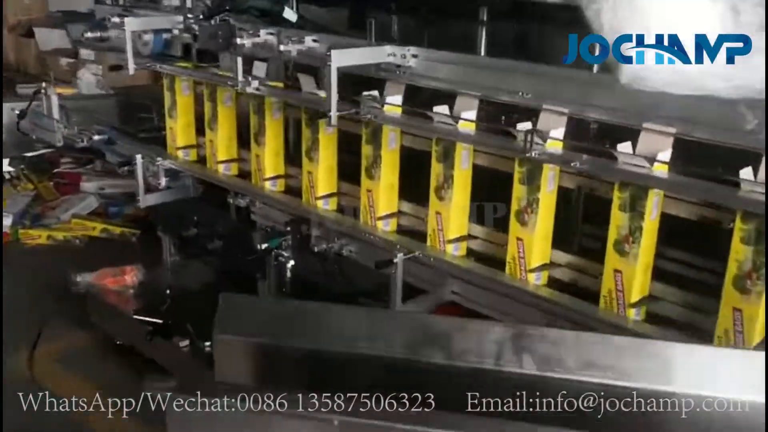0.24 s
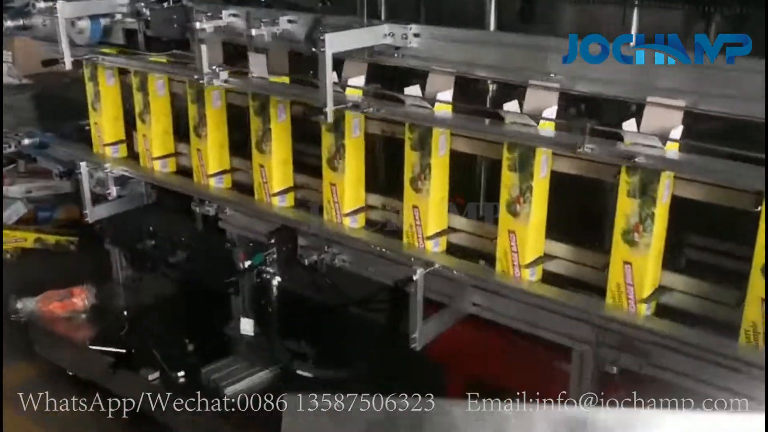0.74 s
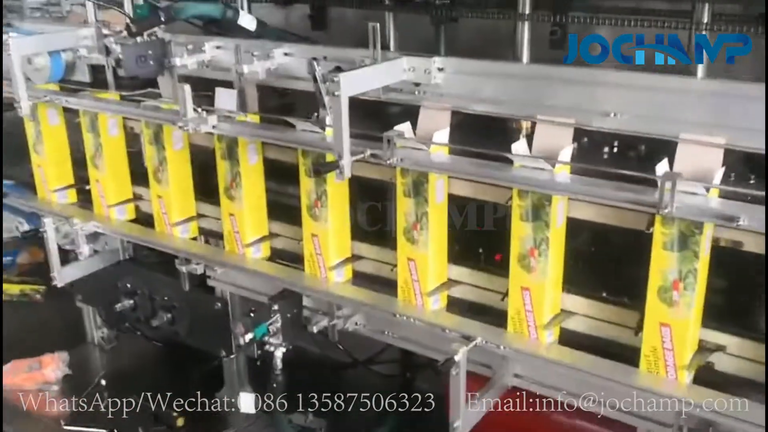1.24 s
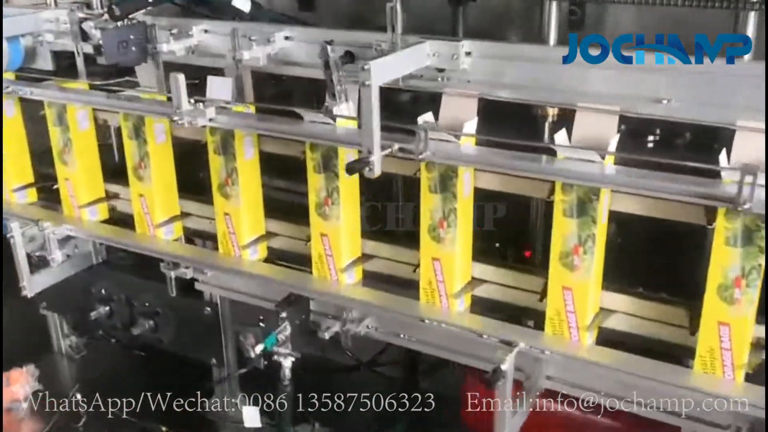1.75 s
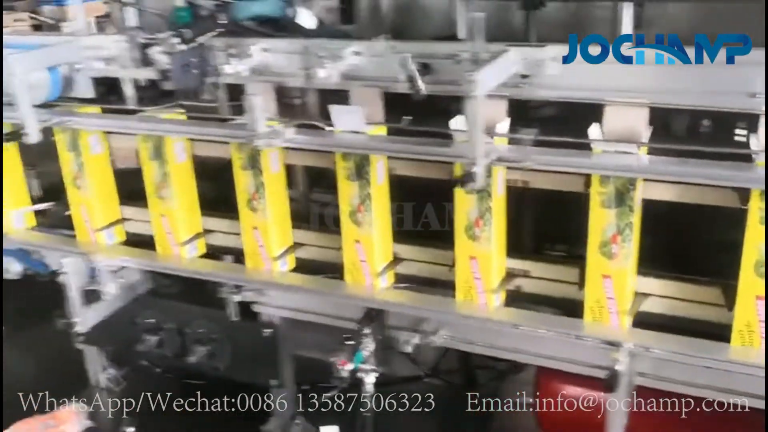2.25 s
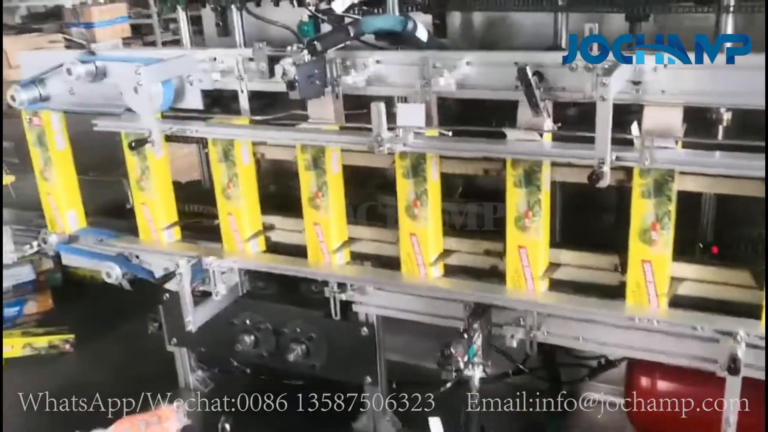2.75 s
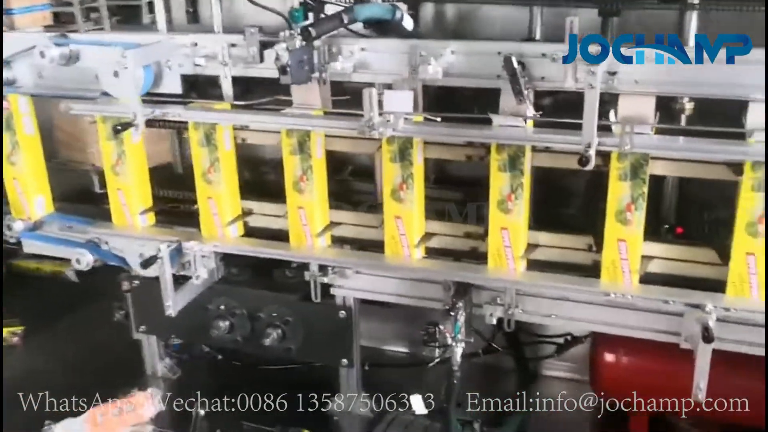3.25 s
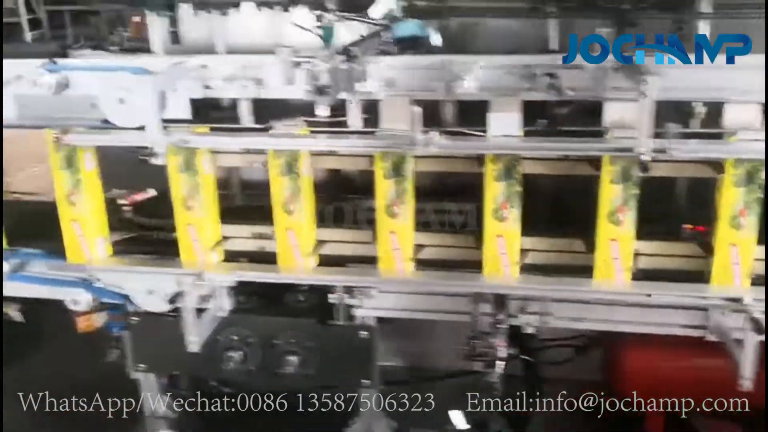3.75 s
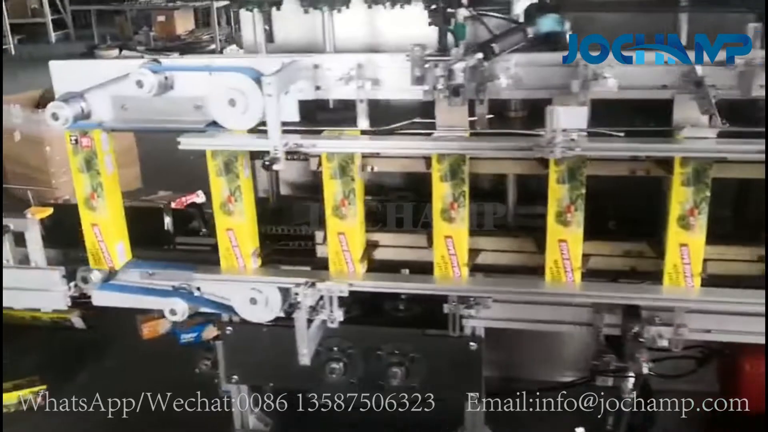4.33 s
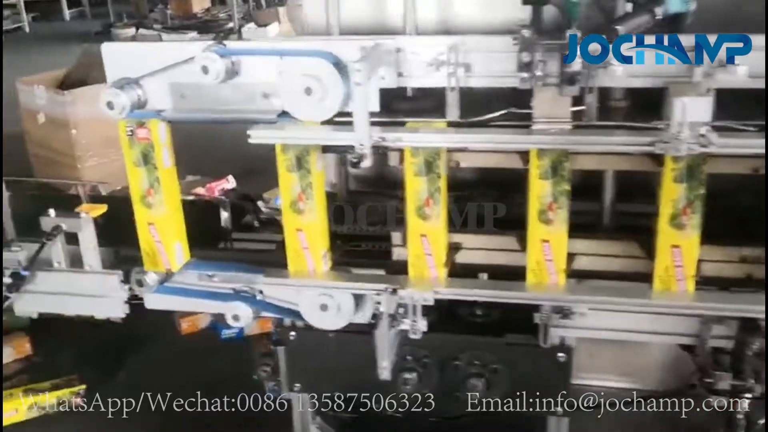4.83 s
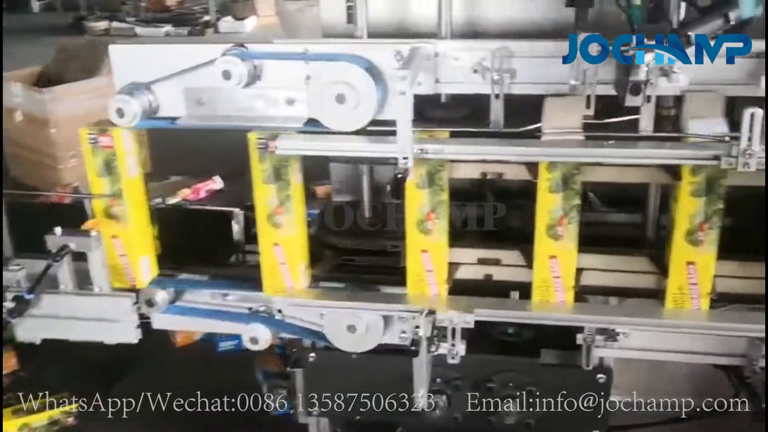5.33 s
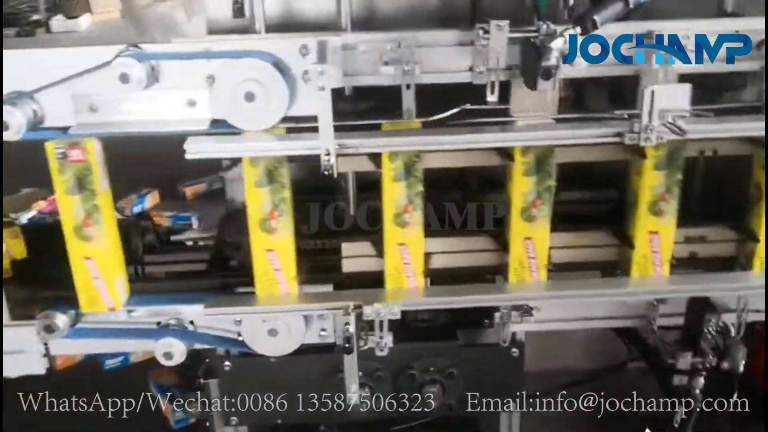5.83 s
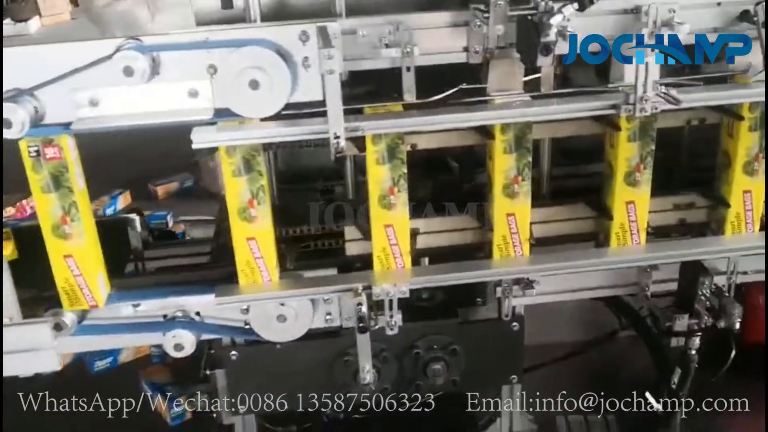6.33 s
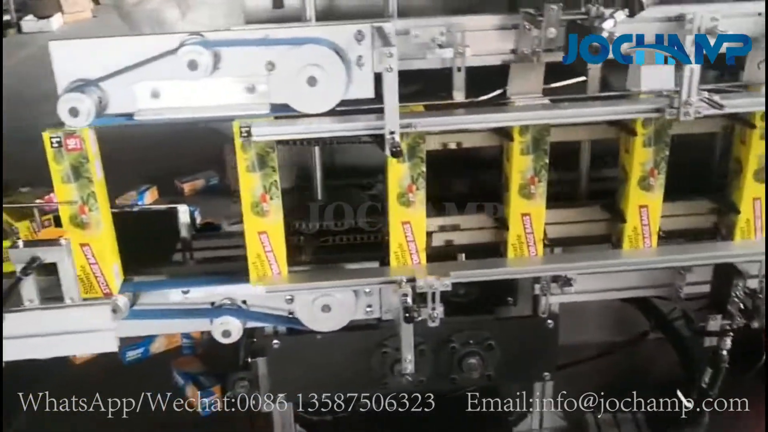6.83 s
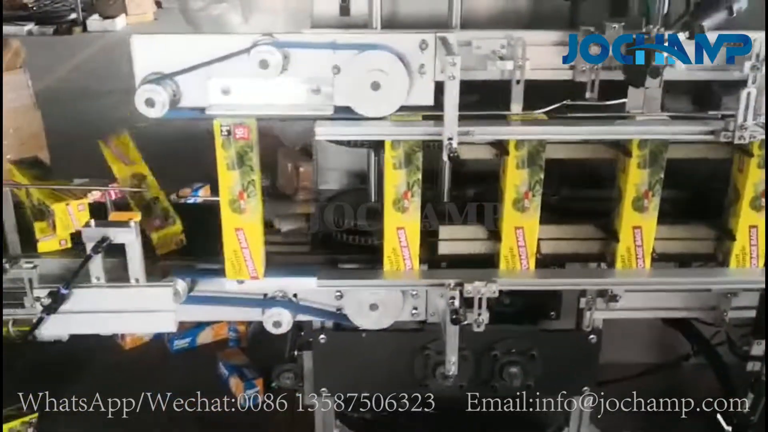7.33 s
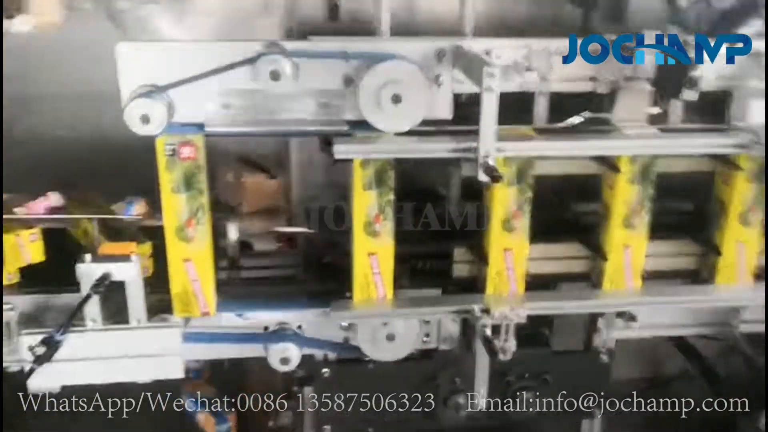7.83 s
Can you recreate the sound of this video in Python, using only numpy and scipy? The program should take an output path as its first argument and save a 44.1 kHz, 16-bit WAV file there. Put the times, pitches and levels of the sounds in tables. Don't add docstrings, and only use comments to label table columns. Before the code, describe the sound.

A carton-packing machine runs in a hard-walled factory hall, picked up about a metre away by a phone-like stereo microphone. Steady motor hum, airy hall noise and a thin servo whine fill the gaps. Steps begin near 0.1, 1.7, 3.4, 5.0 and 6.6 seconds, each lasting just under a second: low rumble, singing gears, scraping cardboard and rattling steel chain, then an easing. Valves pop and puff throughout, notably around 0.5, 1.0, 2.0 and 2.5. A sharp metal clack lands at 3.7 amid a long, softer air blast from 3.5. A bright chain tick at 5.0 precedes a short, louder hiss at 5.1 and a clack at 5.3. The final step rumbles strongest, with exhaust at 6.75, knocks at 6.97, a heavy hollow carton hit at 7.26 and a strong puff at 7.46, before settling to hum by about 8.

```python
import sys
import numpy as np
from scipy import signal
from scipy.fft import rfft, irfft, next_fast_len
from scipy.io import wavfile
from scipy.ndimage import uniform_filter1d

SR = 44100
rng = np.random.default_rng(int(sys.argv[2]) if len(sys.argv) > 2 else 0)


def invert_db(x):
    u = np.asarray(x, float) / 20
    return 10 ** u


def wav_record(signal):
    frames = np.transpose(np.atleast_2d(signal))
    bounded = np.clip(frames, -1, 1)
    quanta = np.round(bounded * 32767).astype(np.int16)
    wavfile.write(sys.argv[1], SR, quanta)


N = 356769
T = np.arange(N) / SR

# (start [s], length [s], frame rumble [dB], carton scrape [dB], chain clatter [dB])
STROKES = [
    (0.131, 0.88, -29.5, -35, -36.5),
    (1.729, 0.92, -29, -34.5, -34.5),
    (3.385, 0.87, -30.5, -33.5, -33.5),
    (4.992, 0.87, -29.5, -33.5, -33.5),
    (6.599, 0.85, -27.5, -33, -32),
]
# (time [s], frame [dB], cartons [dB], chain [dB])
JOLTS = [(0.13, -34, -35.5, -26), (0.369, -38, -51, -34), (0.989, -31, -42.5, -39), (1.745, -25, -34, -40),
         (1.957, -27.5, -41, -27), (2.67, -34, -62, -46), (3.415, -50, -46, -50), (3.737, -34, -45, -27.5),
         (4.01, -30, -32, -31.5), (4.198, -28, -46, -38), (5.341, -28, -41, -25.5), (5.537, -41, -36, -31),
         (5.91, -39, -58, -52), (6.968, -26.5, -35, -26.5), (7.257, -28, -31.5, -32)]
# (frequency [Hz], level [dB])
SCRAPE_COLOUR = [(250, -30), (420, -10.5), (665, -3.5), (822, 0.5), (912, -2), (1170, -3), (1320, -3.5),
                 (1550, -2.5), (2020, -15.5), (3410, -120)]
# (frequency [Hz], level [dB])
CLATTER_COLOUR = [(880, -44), (1500, -14.5), (1670, -1.5), (2350, -2.5), (2960, -9), (3220, -11),
                  (6130, -17.5), (7150, -17.5), (8000, -39), (10400, -65), (17600, -120)]
FAR_LAG_S, NEAR_LAG_S = 0.0003, 0.00055
CARTON_LAG_S, LUG_LAG_S = 0.0002, 0.0004


def response(points, size):
    hz, db = np.transpose(points)
    bin_hz = np.arange(size // 2 + 1) * SR / size
    return invert_db(np.interp(np.log(np.maximum(bin_hz, 1)), np.log(hz), db))


def shape(x, points):
    size = next_fast_len(x.shape[-1])
    return irfft(rfft(x, size) * response(points, size), size)[..., :x.shape[-1]]


def unit(x):
    return x / np.sqrt(np.mean(x ** 2))


def walk(rate):
    knots = rng.standard_normal(int(N / SR * rate) + 2)
    return 1.19 * np.interp(T * rate, np.arange(len(knots)), knots)


def add(track, s, sound):
    i = int(s * SR)
    track[i:i + len(sound)] += sound[:N - i]


def ports(mid, side, lag_s):
    # (frequency [Hz], level [dB])
    width = [(60, -41), (110, -38), (200, -26), (380, -4.5), (700, -2), (1290, -0.5), (2380, -2.5),
             (4400, -0.5), (8120, -9), (15000, -5)]
    side = shape(side, width)
    left = np.roll(mid + side, round(lag_s * SR))
    return invert_db(-0.16) * np.array([left, mid - side])


def noise(points, grit_db=0., flicker_db=1.):
    grains = rng.standard_normal((2, N)) * invert_db(grit_db * walk(900) + flicker_db * walk(22))
    return unit(shape(grains, points))


def tones(lines, wander, flicker_db, side_db=0.):
    mid, side = 0, 0
    for hz, db in lines:
        turn = 2 * np.pi * hz * T + wander * walk(32)
        size = np.sqrt(2) * invert_db(db + flicker_db * walk(55))
        mid = mid + size * np.sin(turn)
        side = side + size * np.sin(turn + 2.38 * walk(3.4))
    return np.array([mid, invert_db(side_db) * side])


def cam(levels_db, rule):
    leads_s = [0.1, 0.087, 0.1, 0.087, 0.079]
    take_up_s = 0.03
    slack_db, full_s, eased_s, eased_db, end_db, out_s, over_db, rest_db = rule
    points = []
    for (s, length, *_), lead, db in zip(STROKES, leads_s, levels_db):
        points += [(s - lead - take_up_s, rest_db), (s - lead, db + slack_db)]
        points += [(s + full_s, db), (s + eased_s, db + eased_db)]
        points += [(s + length, db + end_db), (s + length + out_s, rest_db + over_db)]
    return invert_db(np.interp(T, *np.transpose(points)))


def shake(levels_db, t60):
    late = T - np.array(JOLTS)[:, :1]
    return ((late > 0) * invert_db(levels_db[:, None] - 60 * np.abs(late) / t60)).sum(0)


def motion(layer, rule, t60):
    moving = cam(np.transpose(STROKES)[2 + layer], rule)
    return np.hypot(moving, shake(np.transpose(JOLTS)[1 + layer], t60))


def hall():
    # (frequency [Hz], level [dB])
    hall_colour = [(15, -40), (25, -1), (90, -0.5), (149, -4), (236, -7), (335, -15.5), (520, -26),
                   (1000, -17), (1400, -34), (2280, -5), (4870, -25), (7400, -12.5), (10500, -17),
                   (16000, -18.5)]
    # (frequency [Hz], level [dB])
    idle = [(145.3, -50.5), (333.8, -52.5), (2067, -50), (2264, -52.5), (3160, -62.5)]
    hum = tones(idle, wander=0.2, flicker_db=0.6, side_db=-9)
    return invert_db(-43) * noise(hall_colour, flicker_db=1.5) + hum


def servo():
    # (slack [dB], full at [s], eased at [s], eased [dB], end [dB],
    # run-out [s], then over rest [dB], rest [dB])
    hold_cam = (5, .0, .5, 0, 0, .1, -4, -52.5)
    moving_db = np.full(len(STROKES), -59)
    return cam(moving_db, hold_cam) * tones([(813.5, 3.5)], wander=0.2, flicker_db=0.6, side_db=-9)


def beams():
    # (frequency [Hz], level [dB], width [Hz])
    members = [(86, -5, 13), (141.3, -4.5, 48), (181, 2, 26), (290, -5.5, 16), (325, -9, 17)]
    out = 0
    for hz, db, width in members:
        peak = [(hz - 2 * width, -30), (hz - width / 2, -3), (hz, 0), (hz + width / 2, -3), (hz + 2 * width, -30)]
        out = out + invert_db(db + 0.74 * walk(5.4)) * noise(peak, flicker_db=1.0)
    swell = cam(np.transpose(STROKES)[2], (-8, 0.61, 0.1, -10.5, -6, 0.67, -7, -50))
    return invert_db(-5) * swell * unit(out)


def knocks(table, crack_points, t60, crack_share, lag_s):
    out, t = np.zeros((2, N)), T[:SR // 4]
    size = np.array([0.99, 0.35, 0.68, 0.42, 0.12])
    for s, db, hz, thud_db, pan_db in table:
        detune = 1 + 0.062 * rng.standard_normal(5) * [0, 1, 1, 1, 1]
        ratio = np.array([1, 0.72, 1.12, 1.37, 1.9]) * detune
        rings = size @ np.sin(2 * np.pi * hz * ratio[:, None] * t) * invert_db(-60 * t / t60)
        crack = unit(shape(rng.standard_normal(len(t)), crack_points))
        crack = crack * (invert_db(-60 * t / 0.021) + 0.5 * invert_db(-60 * t / 0.0072))
        thud = np.sin(2 * np.pi * 150 * t) * invert_db(thud_db - 6 - 60 * t / 0.055)
        for ch in range(2):
            blow = invert_db((0.5 - ch) * pan_db) * (0.6 * rings + crack_share * crack) + thud
            add(out[ch], s + (1 - ch) * lag_s, invert_db(db - 4.5) * blow)
    return out


def chain_ticks():
    # (time [s], peak [dB], ring [Hz], left minus right [dB])
    ticks = [(0.3411, -18, 1800, 2), (0.4883, -23, 1770, -3), (1.8796, -18, 2670, -2),
             (3.3594, -21, 1530, 1.0), (3.3877, -22, 1750, 4.0), (3.3915, -19, 1650, 8),
             (3.4111, -22, 1960, 5), (3.435, -33, 1490, -1), (3.4964, -23, 1930, -2.0),
             (3.5133, -31, 1720, 3), (3.5343, -18, 3170, 1.0), (4.008, -28, 1770, -2.0),
             (4.156, -19.5, 1720, 5.5), (4.8944, -24, 1730, 1), (4.9896, -11.5, 1644, 3),
             (5.0212, -23, 2080, 4.5), (5.0404, -25, 1730, -4), (5.1377, -20, 1756, 9),
             (5.5348, -14, 1735, -0.5), (6.5434, -25, 1740, 2.0), (6.5687, -20, 2150, 8),
             (6.5894, -18, 1960, 0.5), (6.6104, -18, 1570, 5.0), (6.6403, -20, 2140, 2.0),
             (6.679, -15.5, 2630, 1.0), (6.7424, -19, 1760, 5), (6.8648, -25, 1690, -4),
             (7.2945, -19, 1680, -10)]
    # (frequency [Hz], level [dB])
    tick_colour = [(700, -26), (1500, -7), (3000, 3), (5000, -6), (8000, -22), (16000, -12)]
    ticks = np.insert(ticks, 3, -25, axis=1)
    return knocks(ticks, tick_colour, t60=0.055, crack_share=0.31, lag_s=LUG_LAG_S)


def lug_knocks():
    # (time [s], peak [dB], ring [Hz], left minus right [dB])
    lugs = [(0.1321, -13.5, 2190, -6), (1.0625, -19.5, 2270, 0), (1.7325, -18, 2320, -4),
            (1.8053, -14.5, 2200, 5), (2.4563, -18, 2780, -8), (2.614, -19, 2140, 3),
            (2.6788, -17, 2176, 8), (3.3914, -41, 2170, 3), (3.4144, -16, 1990, -12),
            (3.5947, -13, 2360, 5), (3.7394, -9, 2240, 7), (4.2088, -19.5, 2450, 7),
            (4.8938, -32, 2290, -9), (4.9886, -26, 2030, 10), (5.2094, -19, 2300, 19),
            (5.3413, -11.5, 1890, 9), (5.5358, -32, 2170, -1), (5.6815, -25, 2900, -2),
            (5.7394, -22.5, 2010, -7), (5.8326, -39, 1910, 2.0), (5.9135, -20.5, 2210, 4.5),
            (6.563, -23.5, 2140, 4), (6.6667, -13.5, 2360, -3), (6.9077, -19, 2260, 18),
            (6.9671, -14.5, 2320, 15), (7.2549, -30, 1940, -8), (7.4604, -23, 2440, -11)]
    lugs = np.insert(lugs, 3, -25, axis=1)
    return knocks(lugs, CLATTER_COLOUR, t60=0.049, crack_share=0.33, lag_s=LUG_LAG_S)


def carton_knocks():
    # (time [s], peak [dB], ring [Hz], thud over ring [dB], left minus right [dB])
    cartons = [(0.167, -16, 790, -26, -15.5), (0.271, -17.5, 1180, -14, -1), (0.37, -21.5, 730, 1, -11),
               (1.746, -34, 965, -22, 1), (1.995, -22, 773, -6, -8), (3.415, -14.5, 1136, -6, -4),
               (3.619, -21, 734, -17, -12), (3.736, -18.5, 806, 12.5, -8), (4.007, -28, 1030, 4, -5),
               (4.988, -19, 1135, -6, -8), (5.026, -17.5, 1250, 2, 0), (5.34, -18, 1338, 10.5, 5),
               (5.534, -21, 768, -9, 18), (5.549, -21, 788, -6, 3), (6.609, -21.5, 780, -18, -9),
               (6.968, -13, 1324, -13, 4), (7.256, -10, 686, -16, -1), (7.276, -34, 980, -7, -1)]
    return knocks(cartons, SCRAPE_COLOUR, t60=0.089, crack_share=0.33, lag_s=CARTON_LAG_S)


def puffs(table, t60):
    # (frequency [Hz], level [dB])
    snap_colour = [(1500, -5), (3000, 3.5), (6000, 3), (7500, 4.5), (10000, 13), (16000, 0)]
    out, t = np.zeros((2, N)), T[:SR // 2]
    fall = invert_db(-60 * t / t60)
    snap_fade = 0.6 * invert_db(-60 * t / 0.0087) + 0.7 * invert_db(-60 * t / 0.065) + 0.34 * fall
    whistle_fade = 0.34 * invert_db(-60 * t / 0.042) + 0.26 * fall
    for s, db, hz, snap_db, pan_db in table:
        gas = rng.standard_normal((3, len(t)))
        snap = unit(shape(gas[:2], snap_colour)) * invert_db(snap_db + 21.0)
        peak = [(hz - 900, -30), (hz - 300, -4), (hz, 0), (hz + 300, -4), (hz + 800, -30)]
        whistle = unit(shape(gas[2], peak))
        for ch in range(2):
            sound = snap[ch] * snap_fade + whistle * whistle_fade
            add(out[ch], s + (1 - ch) * NEAR_LAG_S, invert_db(db - 2.5 + (0.5 - ch) * pan_db) * sound)
    return out


def valves():
    # (time [s], whistle peak [dB], whistle [Hz], snap
    # over whistle [dB], left minus right [dB])
    bleeds = [(0.3443, -30.5, 7440, -17.5, -3), (0.834, -37, 6500, -7.5, 1), (1.9597, -23, 7370, -20, 3.5),
              (2.4556, -22, 8850, -21.5, -1), (3.7393, -19, 7140, -18, 1), (4.0534, -31, 6470, -10.5, -5),
              (5.3436, -21, 7240, -15, 0.0), (5.6815, -28, 8350, -15.5, -1), (6.964, -19.5, 6950, -18.5, -1),
              (7.2554, -34.5, 7260, -12.5, -1), (7.3042, -24, 6500, -18.5, -2)]
    # (time [s], whistle peak [dB], whistle [Hz], snap over whistle [dB], left minus right [dB])
    shuts = [(0.4973, -23, 7400, -21.5, 4), (0.9887, -23, 7600, -18, 3), (2.1154, -22, 6800, -18.5, 7.5),
             (2.608, -24.5, 7140, -13.5, 4.5), (4.2063, -20, 7270, -18, -4.5),
             (5.8329, -17.5, 7900, -24.5, -8), (7.4596, -14, 7100, -24.5, -1)]
    # (time [s], whistle peak [dB], whistle [Hz], snap over whistle [dB], left minus right [dB])
    pilots = [(0.4748, -42, 7400, -12, 1), (0.8844, -40, 7400, -8, 1), (7.3607, -38, 7300, -7, 1),
              (3.4715, -48, 7900, -3, 3), (4.0064, -34, 7000, -20, 1), (4.1112, -27.5, 7500, -16, -2),
              (4.291, -31, 7400, -29, -5), (5.0557, -35.5, 7390, -16, 8), (5.7367, -31.5, 7200, -17.5, -2),
              (5.8805, -38, 7740, -26, 2), (6.5554, -38, 7000, -20, -5), (6.6672, -23, 6860, -37, -2),
              (7.9494, -34, 6960, -29, -1.5)]
    return puffs(bleeds, t60=0.42) + puffs(shuts, t60=0.39) + puffs(pilots, t60=0.15)


def air():
    # (start [s], length [s], hiss [dB], throat roar [dB])
    blasts = [
        (3.535, 0.22, -24.5, -29),
        (5.135, 0.16, -21.5, -26.5),
        (6.756, 0.19, -23, -26.5),
    ]
    # (frequency [Hz], level [dB])
    jet_colour = [(2000, -17), (4500, -2), (5600, -4), (6100, 1), (6600, 8), (7500, 5.5), (9000, 14.5),
                  (12000, 0.5), (16000, 3)]
    # (frequency [Hz], level [dB])
    roar_colour = [(1800, -7.5), (2600, 4), (3300, 0.5), (4300, -6), (5400, -21), (7000, -8)]
    # (frequency [Hz], level [dB])
    nozzle_colour = [(5700, -19.5), (6000, -7), (6150, -0.5), (6400, -5), (6700, -28)]
    hiss, roar = 0, 0
    for s, length, hiss_db, roar_db in blasts:
        gate = (T > s) * invert_db(-60 * np.maximum(T - s - length, 0) / 0.68)
        build_db = np.interp(T - s, [0, 0.021, 0.025, 0.054, length], [-13.5, -13.5, -3, 0, -1.5])
        sag_db = np.interp(T - s, [0, length], [0, -4.5])
        hiss = hiss + gate * invert_db(hiss_db + build_db)
        roar = roar + gate * invert_db(roar_db + sag_db)
    nozzle = invert_db(-9) * noise(nozzle_colour, flicker_db=1.5)
    jet = noise(jet_colour, grit_db=2.0, flicker_db=1.0)
    return hiss * (nozzle + jet) + roar * noise(roar_colour, grit_db=3.0, flicker_db=1.0)


def loose_links():
    # (frequency [Hz], level [dB], time to fall 60 dB [s])
    links = [(706, -6, 0.021), (1030, -1, 0.09), (1180, 2, 0.075), (1430, -6.5, 0.053), (1632, 1.5, 0.021),
             (1945, 0, 0.069), (2130, -0.5, 0.03), (2360, -3.5, 0.089), (2673, 2, 0.059), (3140, -8, 0.043),
             (3730, -4.5, 0.065)]
    # (slack [dB], full at [s], eased at [s], eased [dB], end [dB],
    # run-out [s], then over rest [dB], rest [dB])
    rattle_cam = (-15, .0, 0.54, -7.5, -8, -0.14, 6.5, -56)
    taps_per_s = 60
    out = 0
    for hz, db, t60 in links:
        taps = (rng.random(N) < taps_per_s / SR) * invert_db(1.75 * rng.standard_exponential(N))
        r = invert_db(-60 / (t60 * SR))
        ring = signal.lfilter([1], [1, -2 * r * np.cos(2 * np.pi * hz / SR), r * r], taps)
        sides = np.array([[1], [rng.choice([-1, 1])]])
        out = out + invert_db(db) * unit(ring) * sides
    return invert_db(-2.5) * cam(np.transpose(STROKES)[4], rattle_cam) * unit(out)


def chain_clatter():
    # (slack [dB], full at [s], eased at [s], eased [dB], end [dB],
    # run-out [s], then over rest [dB], rest [dB])
    clatter_cam = (-9.5, .0, .5, -5, -4, 0.28, -1, -43)
    return motion(2, clatter_cam, t60=0.32) * noise(CLATTER_COLOUR, grit_db=1.0, flicker_db=2.08)


def carton_scrape():
    # (slack [dB], full at [s], eased at [s], eased [dB], end [dB],
    # run-out [s], then over rest [dB], rest [dB])
    scrape_cam = (-12, .0, .5, -8, -8, 0.18, 0.5, -50.5)
    return motion(1, scrape_cam, t60=0.9) * noise(SCRAPE_COLOUR, grit_db=-0.5, flicker_db=0.34)


def gear_song():
    # (multiple [1], level over the 12th [dB])
    mesh = [(1, -8.5), (3, -19.5), (5, -17), (7, -18.5), (8, -14.5), (11, -7), (12, -1), (13, -11.5),
            (15, -42)]
    # (time [s], level of the 12th overtone [dB])
    gear_load = [
        [(0.0, -72), (0.12, -51), (0.6, -39.5), (0.802, -51), (0.844, -41), (1.34, -54), (1.5, -65)],
        [(1.6, -72), (1.68, -55), (1.942, -38.5), (2.632, -38.5), (2.656, -46), (3.106, -51.5), (3.2, -69)],
        [(3.3, -66), (3.378, -45), (3.914, -38.5), (3.946, -48), (4.122, -39.5), (4.54, -53), (4.8, -76)],
        [(4.9, -54), (5.012, -45), (5.3, -47), (5.35, -36.5), (5.412, -46), (5.794, -41.5), (6.4, -67)],
        [(6.5, -61), (6.57, -48), (6.826, -41), (7.548, -44.5), (7.686, -68), (7.7, -56), (8.09, -61)],
    ]
    mesh_hz = 145.8
    song = tones([(k * mesh_hz, db) for k, db in mesh], wander=1.1, flicker_db=3.0)
    load_db = np.interp(T, *np.vstack(gear_load).T)
    return invert_db(2.0 + load_db) * song


def frame_rumble():
    # (frequency [Hz], level [dB])
    rumble_colour = [(15, -47), (25, -19), (92, -11.5), (141, 0), (189, -4), (270, -9.5), (321, -9.5),
                     (362, -17), (436, -17.5), (472, -24.5), (600, -26), (780, -55), (1320, -120)]
    # (slack [dB], full at [s], eased at [s], eased [dB], end [dB],
    # run-out [s], then over rest [dB], rest [dB])
    rumble_cam = (-9.5, 0.13, .5, -5, -4.5, 0.35, 3, -44.5)
    return motion(0, rumble_cam, t60=0.5) * noise(rumble_colour, flicker_db=1.8)


def room(x):
    t = T[:SR // 2]
    echo = rng.standard_normal((2, len(t))) * invert_db(-60 * t / 0.41) * (t > 0.004)
    tail = unit(ports(*echo, FAR_LAG_S)) / np.sqrt(len(t))
    return invert_db(-5) * signal.fftconvolve(x.mean(0, keepdims=True), tail, axes=1)[:, :N]


def scene():
    # (frequency [Hz], level [dB])
    lean = [(380, 0), (700, -2), (1290, .5), (2380, 1), (4400, -2), (8120, 1)]
    far = hall() + servo() + beams() + frame_rumble()
    near = air() + loose_links() + chain_clatter() + carton_scrape() + gear_song()
    left, right = ports(*far, FAR_LAG_S) + ports(*near, NEAR_LAG_S)
    spread = np.array([shape(left, lean), shape(right, np.array(lean) * [1, -1])])
    hits = chain_ticks() + lug_knocks() + carton_knocks() + valves()
    return spread + hits + room(hits)


def drop_quiet_treble(hz, bins):
    # (from [Hz], to [Hz], threshold [dB], its scatter [dB])
    dropout = [(8250, 9650, -63, 5), (9650, 10350, -64, 3), (10350, 16500, -88, 1)]
    frames = bins.shape[2]
    for lo, hi, db, scatter_db in dropout:
        for start in np.arange(lo, hi, 350):
            band = (hz >= start) & (hz < min(start + 350, hi))
            power = uniform_filter1d(np.sum(abs(bins[:, band]) ** 2, 1), 3)
            scatter = np.repeat(rng.standard_normal(frames), 5)[:frames]
            bins[:, band] *= power[:, None] > invert_db(2 * (db + scatter_db * scatter))
    return bins


def thin(hz, bins):
    sparse_hz, top_hz, kept, attack_db = 8250, 15300, 0.7, 8
    power = np.sum(abs(bins[:, hz > sparse_hz]) ** 2, (0, 1))
    steady = power < invert_db(2 * attack_db) * np.roll(power, 2)
    cells = rng.random((len(hz) // 4 + 1, bins.shape[2] // 2 + 1)) < kept
    cells = cells.repeat(4, 0).repeat(2, 1)[:len(hz), :bins.shape[2]]
    cells = cells / np.sqrt(kept) * (hz < top_hz)[:, None]
    return bins * np.where((hz > sparse_hz)[:, None] & steady, cells, 1)


def top_cut(x):
    return signal.sosfilt(signal.butter(12, 16500, fs=SR, output="sos"), x)


def record(dry):
    # (frequency [Hz], level [dB])
    final_colour = [(20, -9), (36, 0), (8050, 0), (8250, -14), (9600, -19), (9900, -32), (10250, -32),
                    (10400, -18), (13500, -15), (15250, -11), (15700, -26), (16400, -36)]
    limit = 0.62
    heard = shape(limit * np.tanh(dry / limit), final_colour)
    hz, _, bins = signal.stft(heard, SR, nperseg=1024)
    bins = thin(hz, drop_quiet_treble(hz, bins))
    mix = signal.istft(bins, SR, nperseg=1024)[1][:, :N]
    return top_cut(mix)


dry = scene()
out = record(dry)
wav_record(out)
```